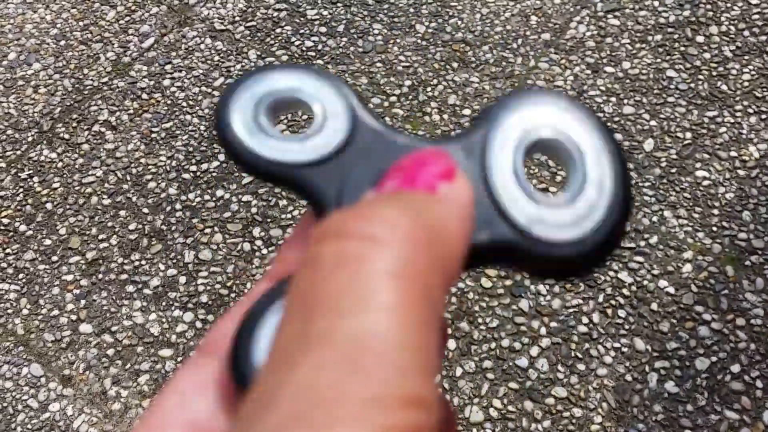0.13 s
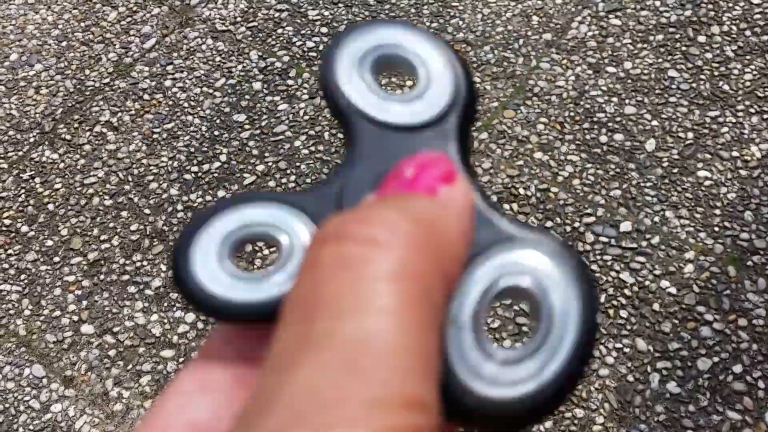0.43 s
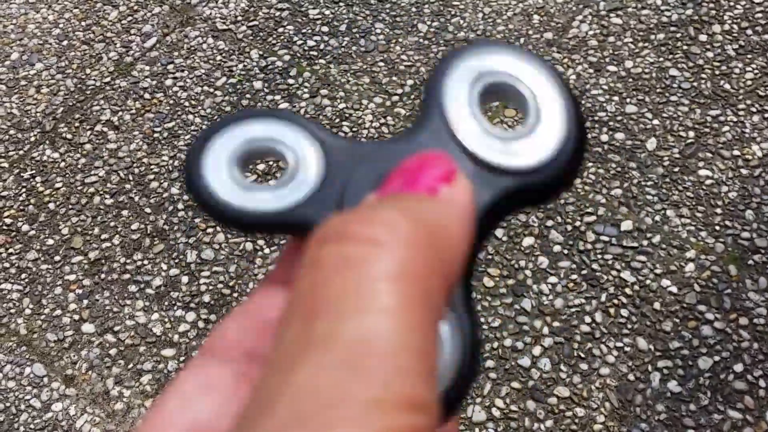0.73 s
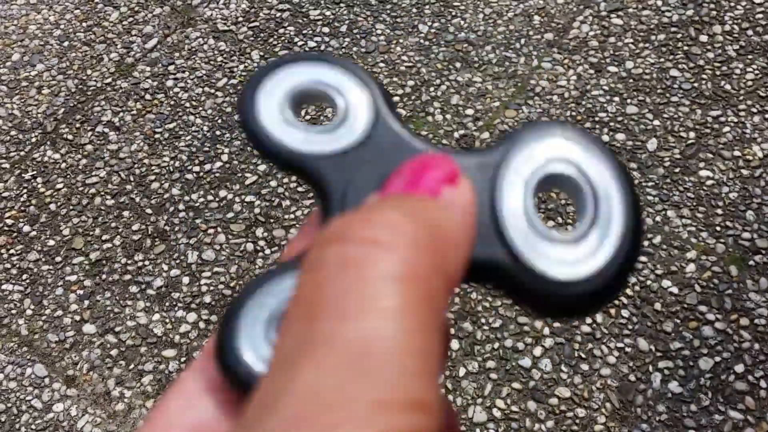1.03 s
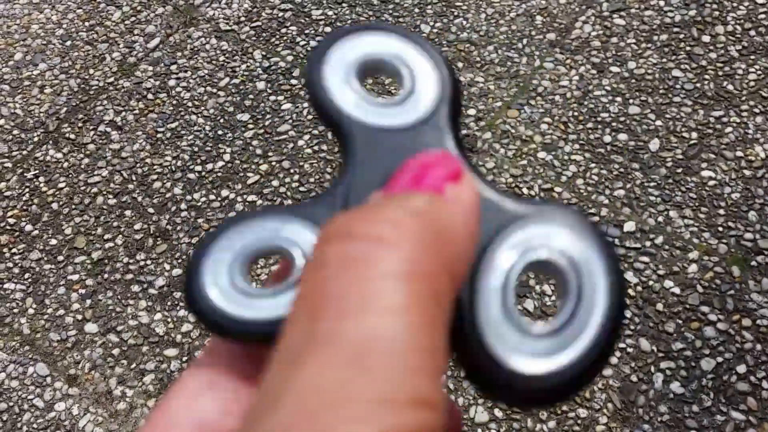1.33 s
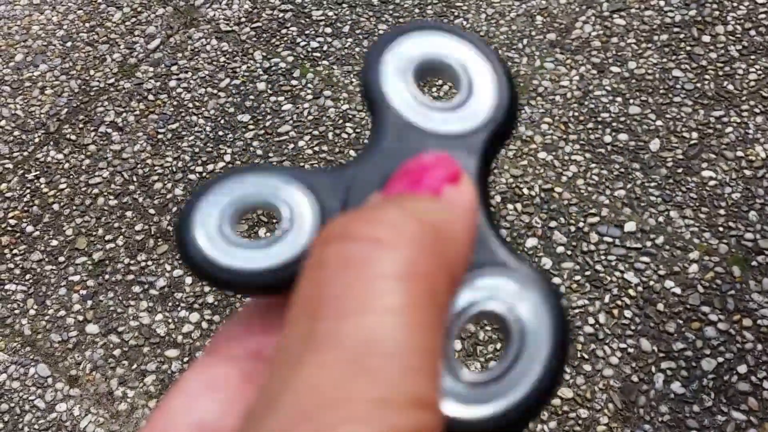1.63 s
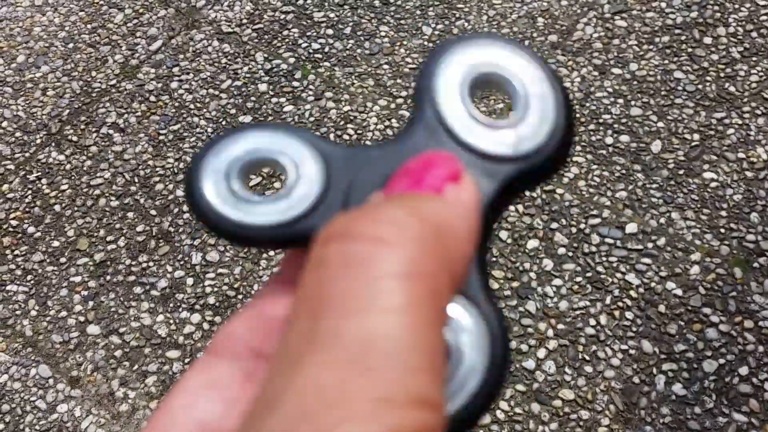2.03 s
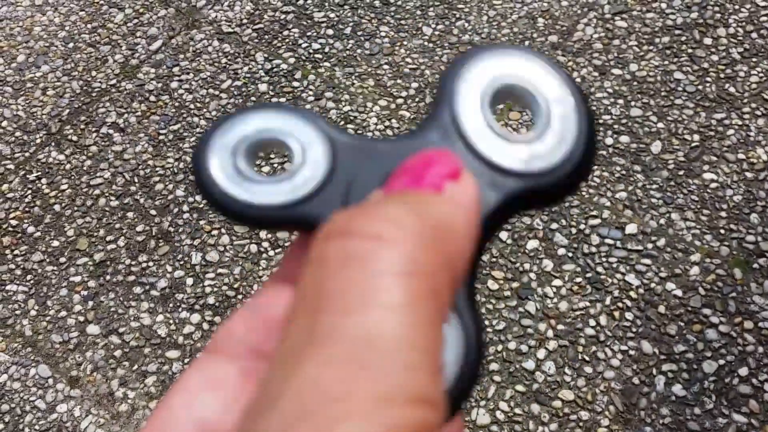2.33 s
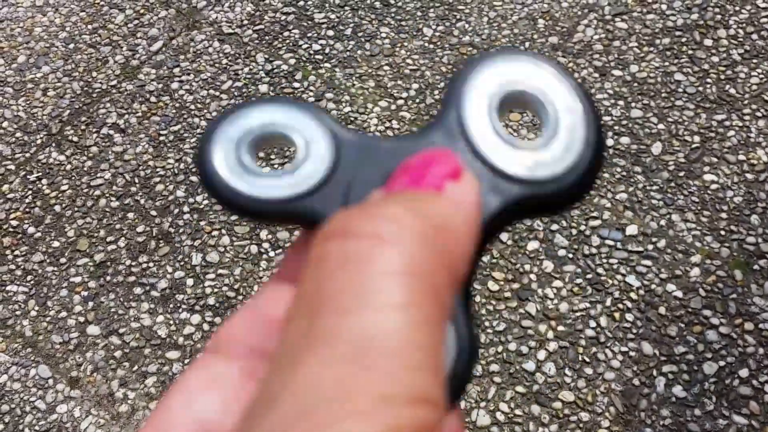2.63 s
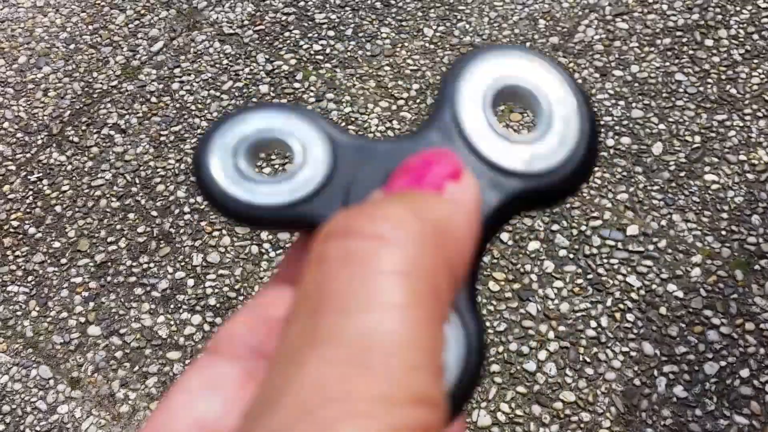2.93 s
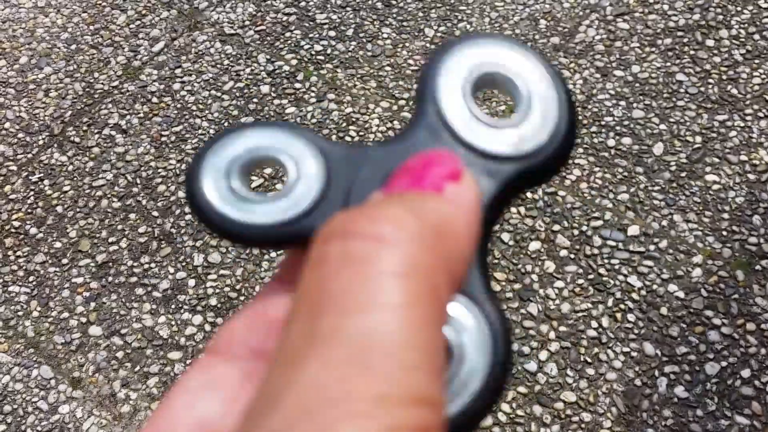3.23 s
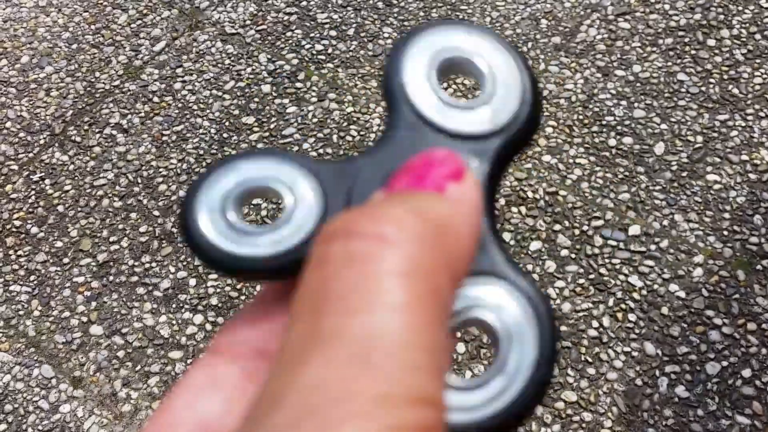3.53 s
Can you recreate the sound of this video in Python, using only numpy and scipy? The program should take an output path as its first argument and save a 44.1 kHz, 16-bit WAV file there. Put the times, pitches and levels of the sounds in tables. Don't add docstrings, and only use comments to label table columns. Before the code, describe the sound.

Steady ringing hiss of a spinning hand toy, with low machine hum and distant traffic rumble

```python
import sys
import numpy as np
from scipy import signal
from scipy.fft import rfft, irfft, next_fast_len
from scipy.io import wavfile

SR = 44100
rng = np.random.default_rng(int(sys.argv[2]) if len(sys.argv) > 2 else 0)


def to_linear_factor(level_db):
    exponent = np.asarray(level_db, float) / 20
    return 10 ** exponent


def unload_audio(sound):
    columns = np.transpose(np.atleast_2d(sound))
    steps = np.round(np.clip(columns, -1, 1) * 32767)
    wavfile.write(sys.argv[1], SR, steps.astype(np.int16))


N = 161847

FLICKER_PER_S = 8


def at_hz(points, hz):
    p = np.array(points, float)
    return np.interp(np.log(1 + hz), np.log(p[:, 0]), p[:, 1])


def in_time(rows):
    s, *columns = np.transpose(rows)
    return [np.interp(np.arange(N) / SR, s, c) for c in columns]


def drift(rate):
    r = np.exp(-80 * np.pi * rate / SR)
    draws = rng.standard_normal(N // 40 + 2002)
    slow = signal.lfilter([1], [1, -2 * r, r * r], draws)[2000:]
    return np.interp(np.arange(N) / 40, np.arange(len(slow)), slow / slow.std())


# pitch_hz, likeness [0-1]
LIKENESS = [(30, .9), (70, .6), (120, .8), (280, .75), (420, .4), (800, .2), (1500, 0)]


def noise(spectrum, left, patchy_db, alike=True):
    size = next_fast_len(N)
    hz = np.arange(size // 2 + 1) * SR / size
    mid, side = rfft(rng.standard_normal((2, size))) * np.sqrt(SR) / 2
    likeness = np.clip(at_hz(LIKENESS, hz), 0, 1) * alike
    shared = np.sqrt(1 + likeness) * mid
    apart = np.sqrt(1 - likeness) * side * [[1], [-1]]
    lowest_hz, highest_hz = spectrum[0][0], spectrum[-1][0]
    gain = to_linear_factor(at_hz(spectrum, hz)) * (hz > lowest_hz)
    pair = gain * np.array([to_linear_factor(at_hz(left, hz)), np.ones_like(hz)]) * (shared + apart)
    octave = np.log2((hz + 1) / lowest_hz)
    out = 0
    for k in range(int(np.log2(highest_hz / lowest_hz)) + 2):
        band = irfft(pair * np.clip(1 - abs(octave - k), 0, 1), size)[:, :N]
        out = out + to_linear_factor(patchy_db * drift(FLICKER_PER_S)) * band
    return out


def tone(hz, wander, lead):
    phase = 2 * np.pi * (hz * np.arange(N) / SR + rng.random()) + wander * drift(2.0)
    return np.sqrt(2) * np.sin(phase + [[lead], [0]])


# pitch_hz, level_db [dB per Hz]
BEARING_HISS = [(700, -108), (2000, -105), (3500, -102), (5000, -109), (7000, -121), (9000, -127),
                (11300, -117), (16000, -114)]
# pitch_hz, left_db
BEARING_LEFT = [(700, 5), (2000, -2.5), (3500, 6), (5000, 3.5), (7500, -22), (11000, -2.5), (16000, 0.5)]
PORT_HZ, PORT_WIDTH_HZ, PORT_DB = 3515, 395, 16.5


def bearing():
    hiss = noise(BEARING_HISS, BEARING_LEFT, patchy_db=.5, alike=False)
    r = np.exp(-np.pi * PORT_WIDTH_HZ / SR)
    w = 2 * np.pi * PORT_HZ / SR
    ring = signal.lfilter([(1 - r * r) / 2, 0, (r * r - 1) / 2], [1, -2 * r * np.cos(w), r * r], hiss[0])
    return hiss + [[to_linear_factor(PORT_DB)], [0]] * ring


# multiple [of shaft speed], left_db, right_db
MOTOR_LINES = [(9, -75, -88), (10, -80, -77), (12, -79, -83), (15, -71, -83), (16, -77, -82),
               (17, -73, -61), (19, -69, -66), (20, -87, -80), (23, -78, -79), (24, -92, -83),
               (26, -86, -81), (27, -93, -82), (28, -86, -81), (29, -85, -93), (30, -75, -86),
               (31, -86, -88), (33, -86, -83), (34, -92, -88), (35, -86, -82), (37, -83, -76),
               (42, -98, -88), (47, -120, -86)]
SHAFT_HZ, WHINE_FLUTTER_DB = 46.75, 1.6
SIDE_HZ, SIDE_LEFT_DB, SIDE_RIGHT_DB, SIDE_WANDER_RAD = 813, -80, -69, 3.0


def whine():
    out = to_linear_factor([[SIDE_LEFT_DB], [SIDE_RIGHT_DB]]) * tone(SIDE_HZ, SIDE_WANDER_RAD, 1)
    for multiple, left_db, right_db in MOTOR_LINES:
        level = to_linear_factor([[left_db], [right_db]] + WHINE_FLUTTER_DB * drift(3.0))
        out += level * tone(round(multiple) * SHAFT_HZ, .3, 2 * np.pi * rng.random())
    return out


# time_s, first_machine_db, second_machine_db, sum_tone_db, overtones_db
MACHINES = [(0.05, -46.0, -62.0, -61.0, -58.0), (0.26, -45.0, -57.0, -60.0, -63.0),
            (0.47, -46.0, -57.0, -64.0, -62.0), (0.68, -45.0, -59.0, -63.0, -61.0),
            (0.89, -46.0, -63.0, -59.0, -60.0), (1.1, -48.0, -70.0, -55.0, -68.0),
            (1.31, -47.0, -54.0, -54.0, -66.0), (1.52, -49.0, -51.0, -54.0, -71.0),
            (1.73, -45.0, -52.0, -54.0, -69.0), (1.94, -45.0, -55.0, -58.0, -70.0),
            (2.15, -49.0, -60.0, -62.0, -62.0), (2.36, -45.0, -55.0, -63.0, -63.0),
            (2.57, -41.0, -54.0, -61.0, -69.0), (2.78, -42.0, -52.0, -59.0, -70.0),
            (2.99, -45.0, -55.0, -64.0, -57.0), (3.2, -46.0, -57.0, -65.0, -57.0),
            (3.41, -46.0, -67.0, -66.0, -60.0), (3.62, -45.0, -70.0, -60.0, -59.0)]
FIRST_HZ, SECOND_HZ = 119.25, 99.9
HUM_DB, HUM_PAN_DB, HUM_FLUTTER_DB = 1.5, -1.5, .7
HUM_LEAD_RAD, HUM_WANDER_RAD = .2, .15
SUM_TONE_DB, OCTAVE_DB, THIRD_DB, SECOND_OCTAVE_DB = 2.0, 2.0, -3, -11


def hum():
    first, second, both, over = in_time(MACHINES)
    parts = [(FIRST_HZ, first),
             (SECOND_HZ, second),
             (FIRST_HZ + SECOND_HZ, both + SUM_TONE_DB),
             (2 * FIRST_HZ, over + OCTAVE_DB),
             (3 * FIRST_HZ, over + THIRD_DB),
             (2 * SECOND_HZ, second + SECOND_OCTAVE_DB)]
    out = 0
    for hz, db in parts:
        level = to_linear_factor(db + HUM_DB + HUM_FLUTTER_DB * drift(FLICKER_PER_S / 2))
        out = out + level * tone(hz, HUM_WANDER_RAD, HUM_LEAD_RAD * hz / FIRST_HZ)
    return to_linear_factor([[HUM_PAN_DB / 2], [-HUM_PAN_DB / 2]]) * out


# start_s, peak_db, pitch_hz, left_against_right_db
TICKS = [
    (.082, -55, 3700, -8),
    (.3462, -46, 3400, -12),
    (.3464, -48, 2500, -3),
    (1.685, -62, 6500, -6),
]
TICK_T60_S, TICK_CRACK_DB = .016, -17


def ticks():
    t, out = np.arange(N) / SR, np.zeros((2, N))
    for start_s, db, hz, pan_db in TICKS:
        since = np.clip(t - start_s, 0, None)
        decay = to_linear_factor(-60 * since / TICK_T60_S)
        crack = to_linear_factor(TICK_CRACK_DB) * rng.standard_normal(N) * decay
        tick = (np.sin(2 * np.pi * hz * since) + crack) * decay
        out += to_linear_factor([[db + pan_db], [db]]) * tick * (t > start_s)
    return out


# time_s, peak_db
BUMPS = [
    (1.375, -41),
    (1.688, -39),
    (3.2833, -32),
    (3.640, -41),
]
BUMP_HZ, BUMP_S = 210, .0018


def bumps():
    t, out = np.arange(N) / SR, np.zeros((2, N))
    for time_s, db in BUMPS:
        push = np.cos(2 * np.pi * BUMP_HZ * (t - time_s))
        out -= to_linear_factor(db) * push * np.exp(-.5 * ((t - time_s) / BUMP_S) ** 2)
    return out


RUB_S, RUB_RISE_S, RUB_FALL_S = .655, .015, .05
RUB_DB, RUB_LOW_HZ, RUB_STUTTER_HZ = -59, 13400, 180


def rub():
    t = np.arange(N) / SR
    high_pass = signal.butter(8, RUB_LOW_HZ, "high", fs=SR, output="sos")
    hiss = signal.sosfilt(high_pass, rng.standard_normal((2, N)))
    puff = np.exp(-abs(t - RUB_S) / np.where(t < RUB_S, RUB_RISE_S, RUB_FALL_S))
    stutter = 1 + np.sin(2 * np.pi * RUB_STUTTER_HZ * t)
    return to_linear_factor([[RUB_DB - 10], [RUB_DB]]) * hiss * puff * stutter


# time_s, length_s, pitch_hz, level_db
PEEPS = [
    (3.442, .008, 2460, -51),
    (3.565, .010, 1790, -61),
    (3.599, .011, 1800, -58),
]
PEEP_PAN_DB, PEEP_ECHO_DB, PEEP_ECHO_S = -4, -17, .06


def bird():
    t, out = np.arange(N) / SR, 0
    for time_s, length_s, hz, db in PEEPS:
        peep = np.exp(-.5 * ((t - time_s) / length_s) ** 2)
        tail = np.exp(-abs(t - time_s) / np.where(t < time_s, length_s, PEEP_ECHO_S))
        echo = to_linear_factor(PEEP_ECHO_DB) * drift(24.0) * tail
        out = out + to_linear_factor(db) * np.sin(2 * np.pi * hz * t) * (peep + echo)
    return to_linear_factor([[PEEP_PAN_DB], [0]]) * out


# pitch_hz, level_db [dB per Hz]
RUMBLE = [(15, -112), (30, -76.5), (60, -75), (105, -74.5), (150, -77.5), (250, -75.5), (420, -87.5),
          (900, -97)]
TRAFFIC = [(300, -105), (550, -93), (900, -92.5), (1400, -97), (2000, -100.5), (2600, -101), (3500, -108),
           (5000, -123)]
LEAVES = [(1500, -110), (2800, -100), (3800, -100), (5300, -104), (7000, -113), (8800, -119), (11000, -115),
          (16000, -115)]
# pitch_hz, left_db
AIR_LEFT = [(20, -2), (100, -1), (1200, 0), (2200, -2), (4500, -2), (7500, -10), (9500, -8), (12000, -2)]
# time_s, traffic_db, gust_db
SWELL = [(0, 2.5, -3), (.3, 0, -1.5), (.75, 4, -1), (1.0, -1, -2), (1.2, -3.5, -4.5), (1.7, -4.5, -3),
         (2.0, 1, -2), (2.3, 1.5, 0.5), (2.5, 2, 5.5), (2.7, 3.5, 8), (2.9, 4, 6), (3.1, 2.5, 1),
         (3.3, 3.5, 0.5), (3.67, 4, -1)]


def outdoors():
    traffic_db, gust_db = in_time(SWELL)
    rumble = noise(RUMBLE, AIR_LEFT, patchy_db=1.0)
    cars = noise(TRAFFIC, AIR_LEFT, patchy_db=1.0)
    leaves = noise(LEAVES, AIR_LEFT, patchy_db=1.0)
    return rumble + to_linear_factor(traffic_db) * cars + to_linear_factor(gust_db) * leaves


def scene():
    return bearing() + whine() + hum() + ticks() + bumps() + rub() + bird() + outdoors()


def top_cut(x):
    return signal.sosfilt(signal.butter(12, 17030, fs=SR, output="sos"), x)


def record(dry):
    low_pass = signal.ellip(14, .3, 60, 15760, fs=SR, output="sos")
    cut = signal.sosfilt(low_pass, dry)
    left_s = np.arange(N)[::-1] / SR
    mix = cut * np.clip(left_s / .004, 0, 1)
    return top_cut(mix)


dry = scene()
out = record(dry)
unload_audio(out)
```